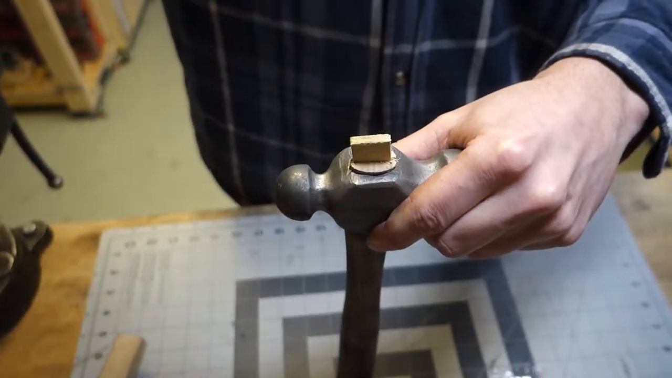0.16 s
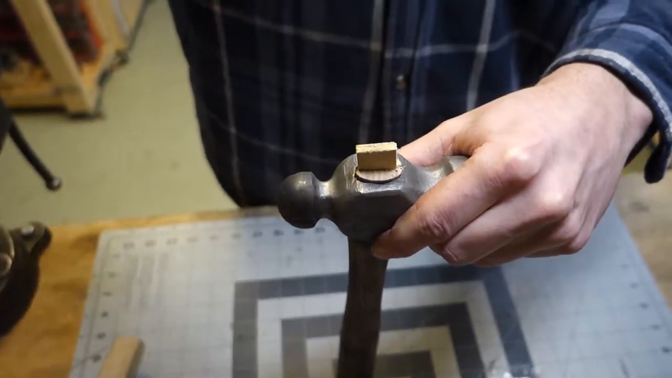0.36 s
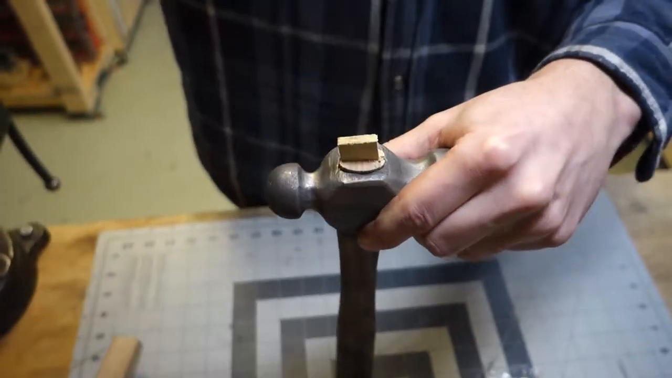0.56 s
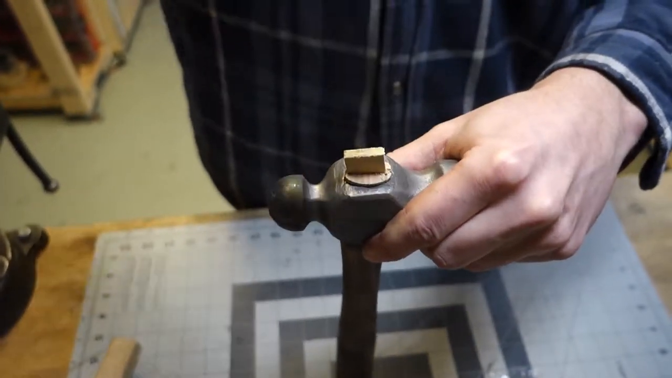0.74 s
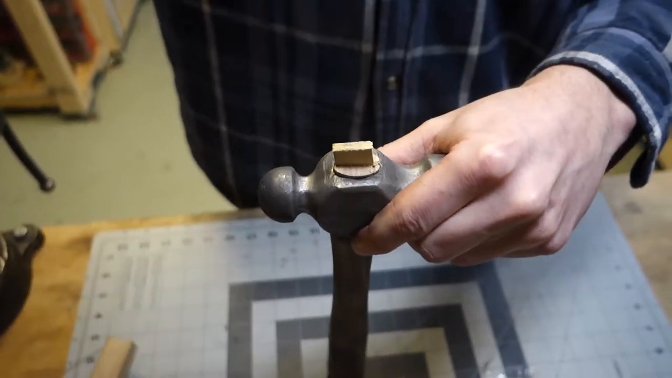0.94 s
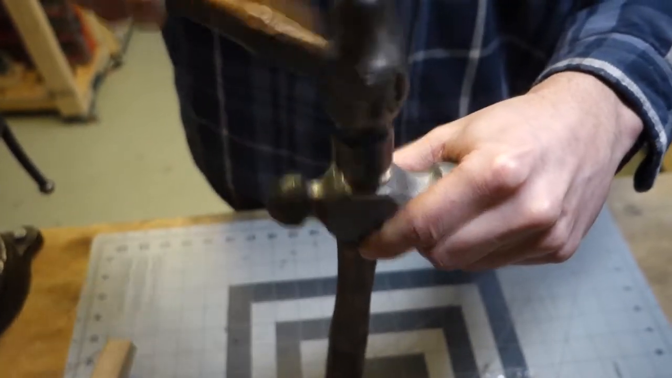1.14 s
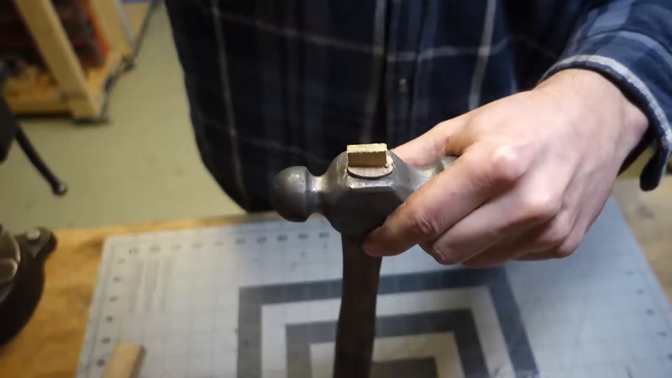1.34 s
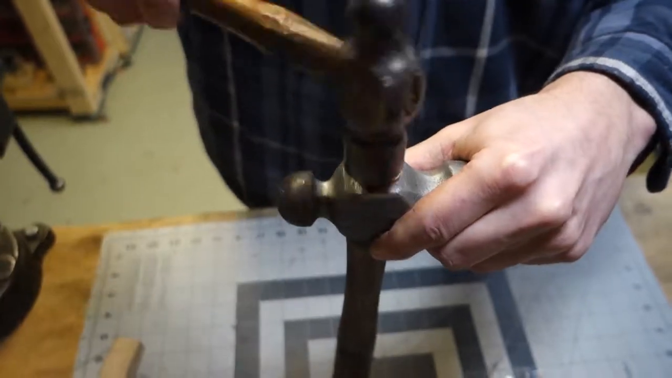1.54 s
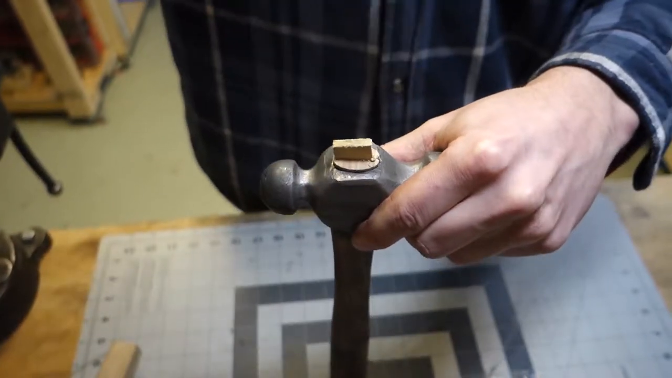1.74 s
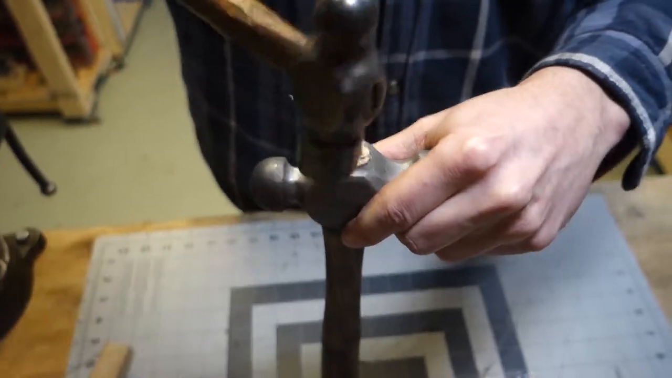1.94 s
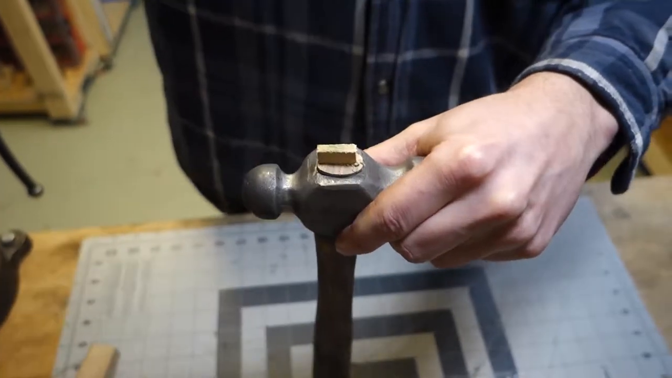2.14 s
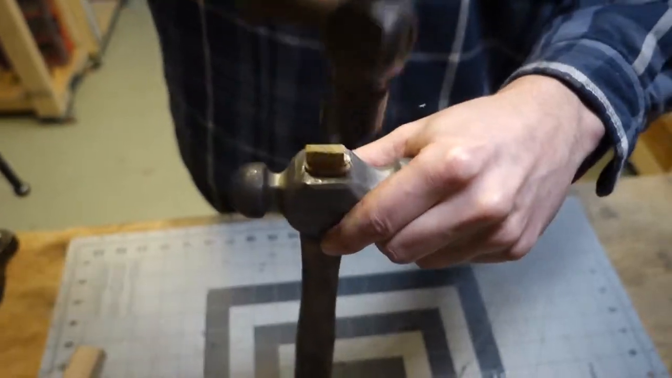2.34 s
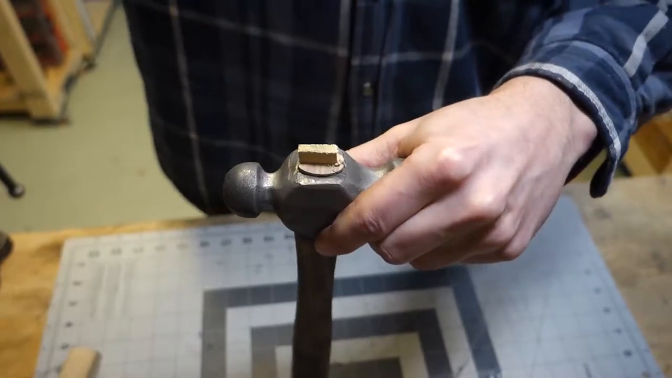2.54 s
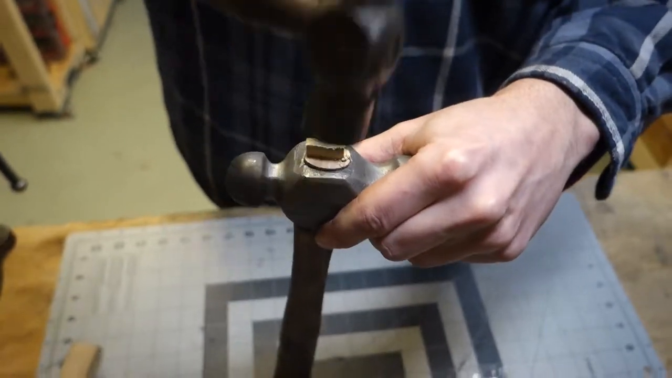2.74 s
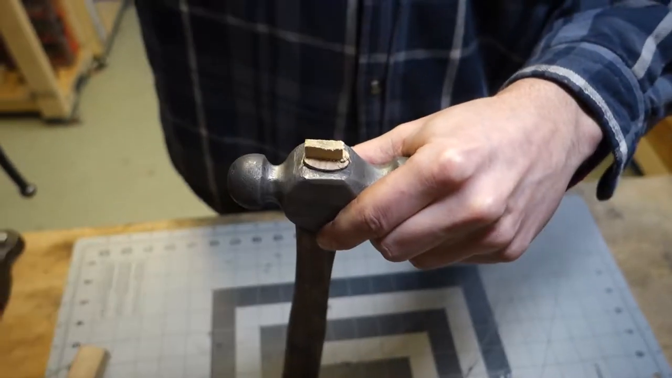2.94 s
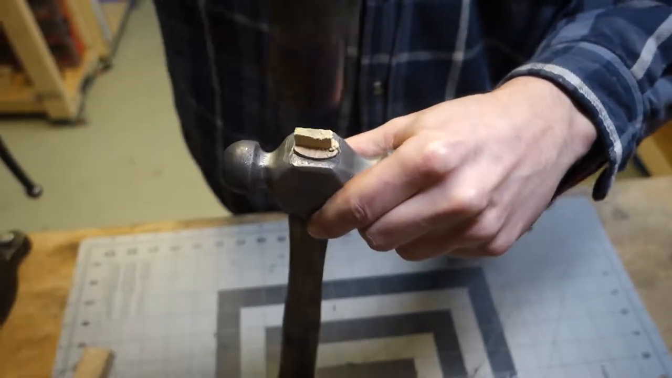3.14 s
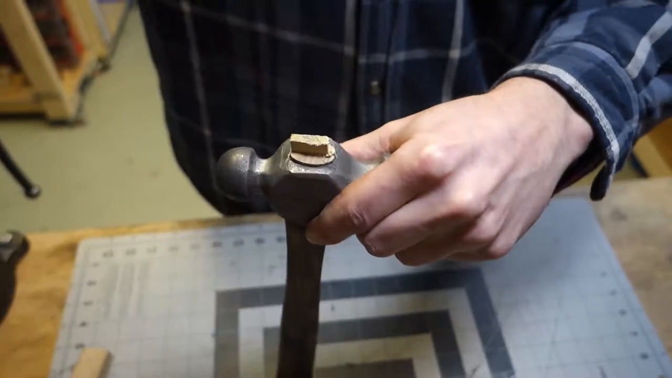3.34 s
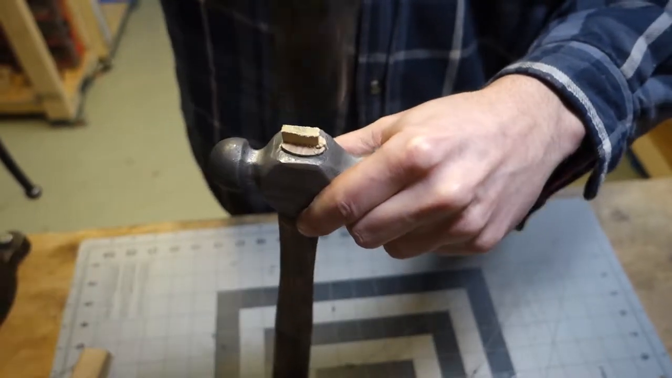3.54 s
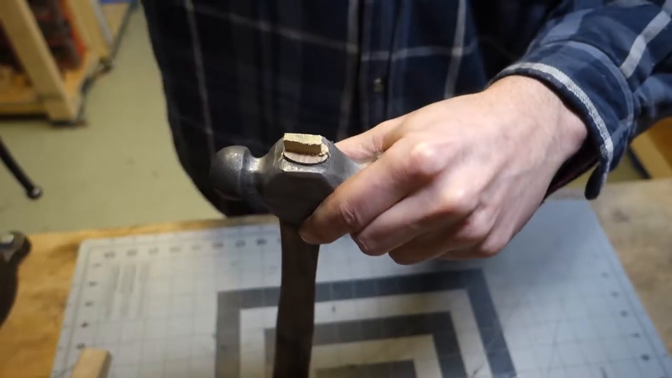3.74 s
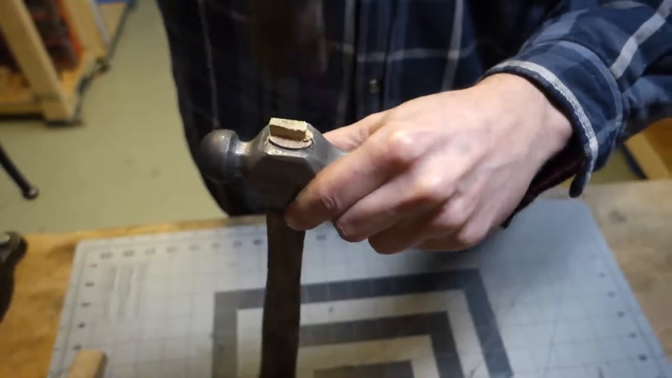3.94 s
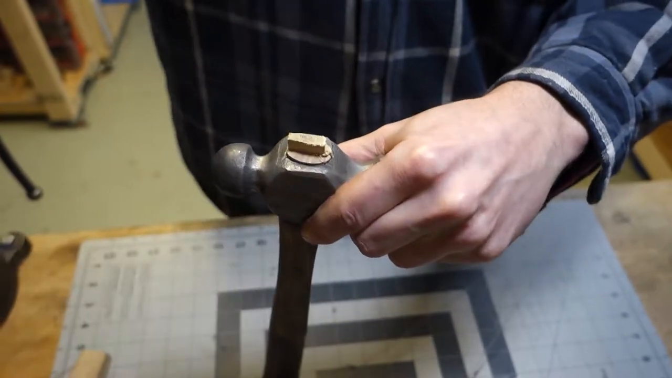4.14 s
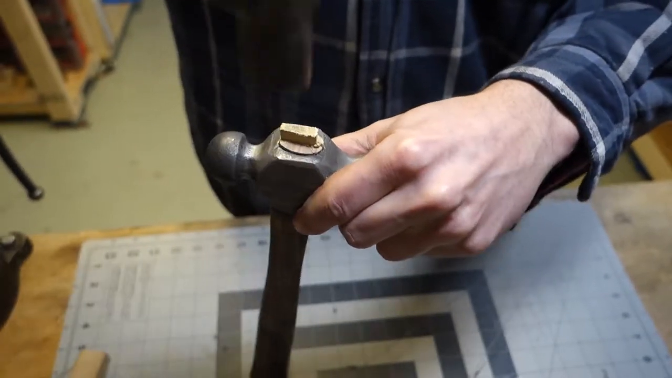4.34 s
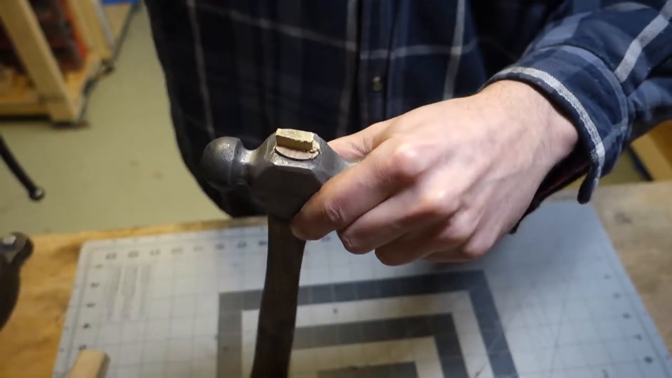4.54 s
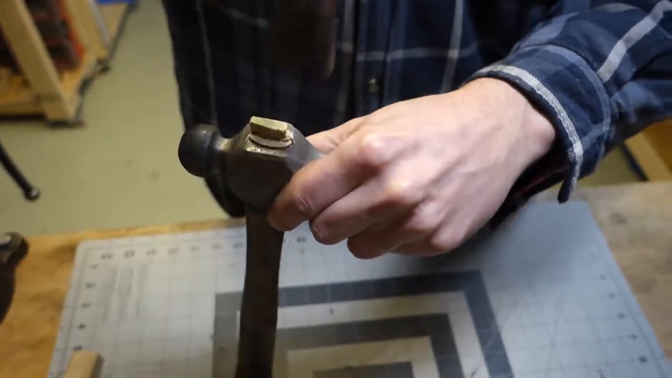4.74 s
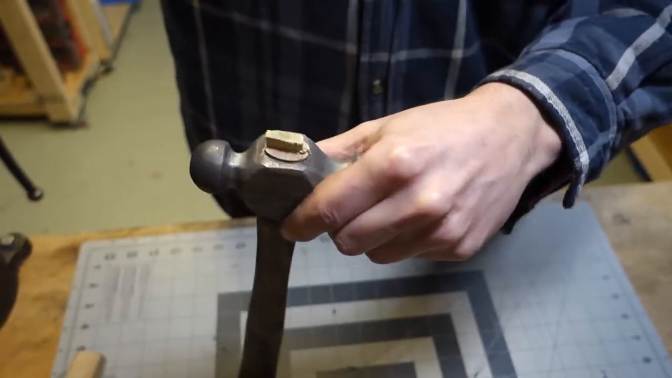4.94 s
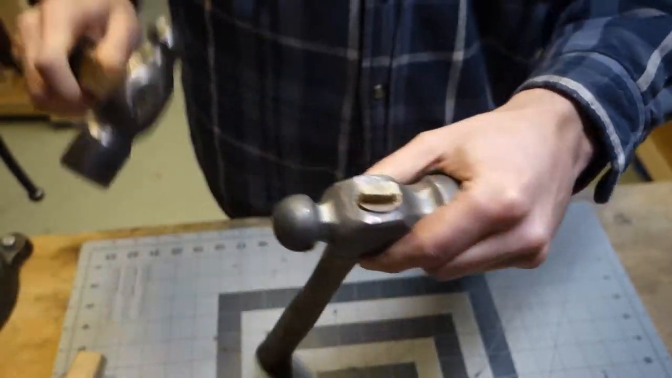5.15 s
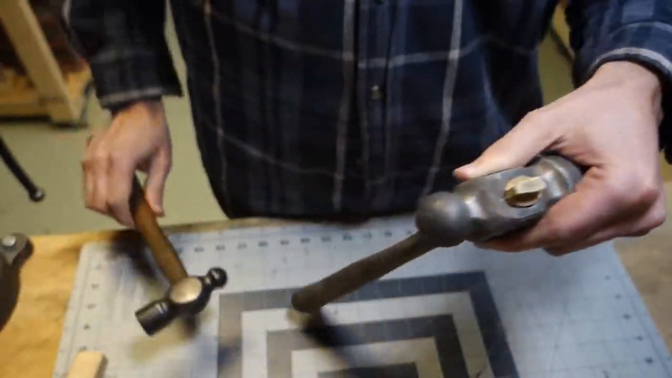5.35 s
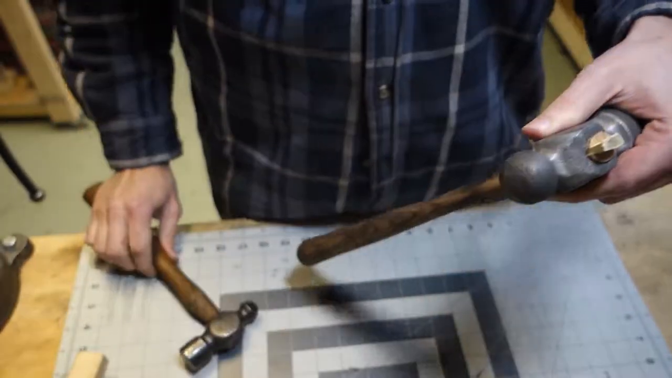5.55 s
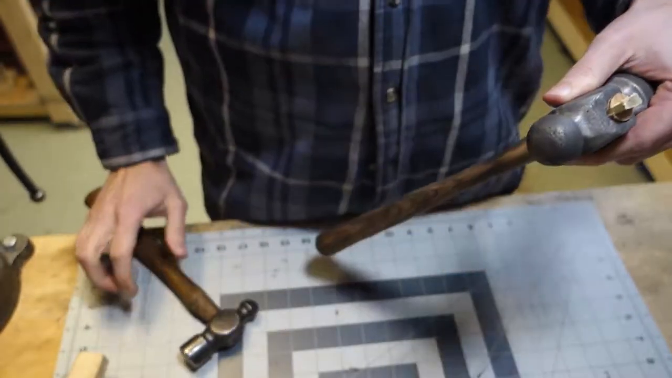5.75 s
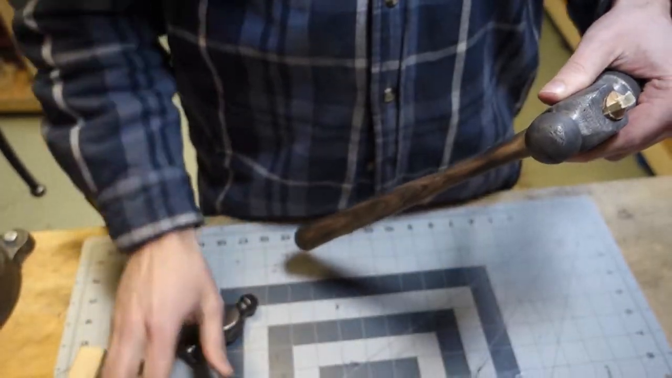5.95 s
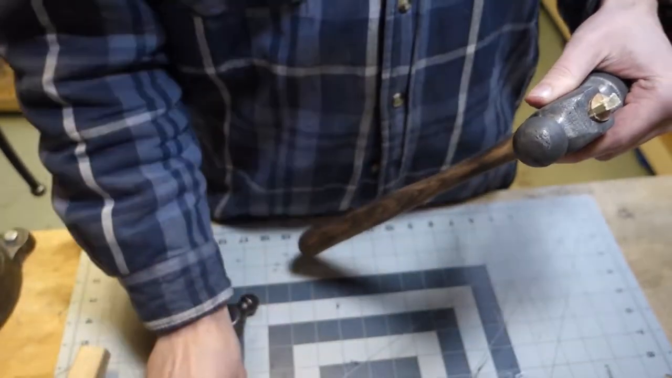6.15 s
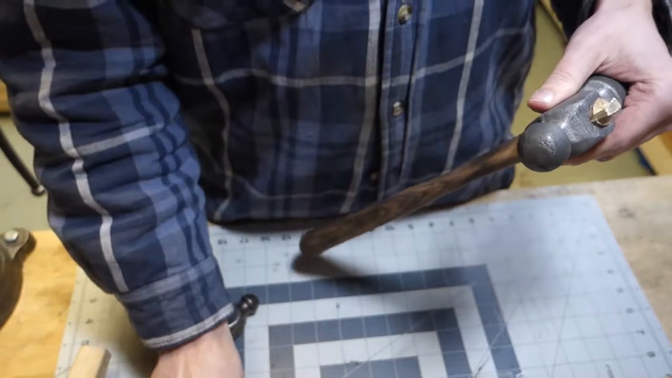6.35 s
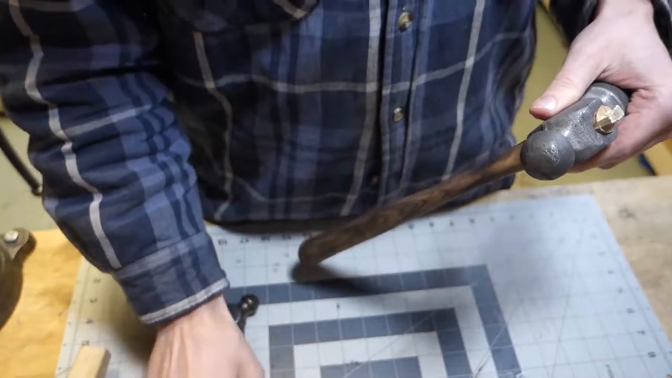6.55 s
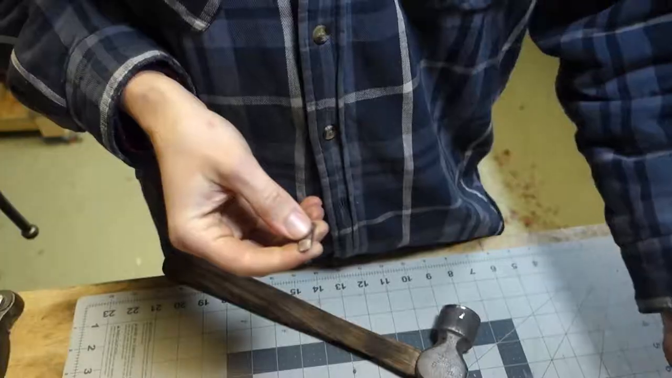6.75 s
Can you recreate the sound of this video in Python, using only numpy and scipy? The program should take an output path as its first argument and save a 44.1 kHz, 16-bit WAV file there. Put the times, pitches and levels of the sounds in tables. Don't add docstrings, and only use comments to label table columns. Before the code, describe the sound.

Twelve even hammer blows knock a wooden wedge home with bench booms and rattling loose steel, then the hammer is laid down and small parts clink.

```python
import sys
import numpy as np
from scipy import signal
from scipy.io import wavfile

SR = 44100
rng = np.random.default_rng(int(sys.argv[2]) if len(sys.argv) > 2 else 0)


def boost(x):
    u = np.asarray(x, float) / 20
    return 10 ** u


def store_pcm(level_fs):
    pcm = np.round(np.clip(level_fs, -1, 1) * 32767).astype(np.int16)
    wavfile.write(sys.argv[1], SR, np.atleast_2d(pcm).T)


N = 299435

# t/s, crack of steel on wood level/dB, ring of the striking head level/dB
BLOWS = [(0.446, -39, -53), (0.8301, -60, -46), (1.2045, -44, -38), (1.573, -43, -53.5), (1.9573, -50, -45),
         (2.3464, -42, -51.5), (2.7421, -45, -50.5), (3.129, -33.5, -55.5), (3.5342, -33.5, -44),
         (3.9151, -31.5, -48.5), (4.32, -40.5, -45.5), (4.71, -40, -60)]
# force/dB, brightness/dB, tock of the wedge level/dB
LANDINGS = [(-.3, 0.9, -25), (.3, -0.1, -29.5), (.3, -0.5, -27.5), (.3, -1.3, -29.5), (.3, -0.45, -27),
            (-.3, 0.6, -23.5), (.3, 0.5, -22), (.3, -1, -22.5), (.3, 0.24, -21), (.3, 0.5, -19.5),
            (.3, -0.8, -21), (.3, -0.1, -20.5)]
LOOSE_FORCE_DB, SEATED_FORCE_DB, SEATING_S = -4, -13.5, 4.1
LOOSE_HARD_DB, SEATED_HARD_DB, HARDENING_S = -2.5, 0.3, 0.95
HANDLE_LAG_S = 0.0007
PARTING_S = 0.16
CONTACT_HZ = 850
# f/Hz, level/dB, T60/s
BENCH_MODES = [(61.1, -16, 0.33), (95.04, -32, 0.72), (136.5, 0.5, 0.19), (147.2, -15, 0.4),
               (176, 1, 0.023), (214.4, -6.5, 0.28), (249, -8, 0.24), (301.3, -4, 0.066),
               (331.1, -4.5, 0.24), (376.5, -10, 0.28), (403.5, -16, 0.36), (477, -18, 0.35),
               (521, -19.5, 0.29), (586, -32.5, 0.072), (640, -18, 0.1), (760, -28, 0.17),
               (1300, -35.5, 0.2), (1630, -27.5, 0.14), (1569, -15.5, 0.36), (2130, -32, .15)]
# f/Hz, level/dB
PANELS = [(440, -29.5), (522, -28.5), (769, -30), (947, -32.5), (1232, -29.5), (1510, -36), (1555, -34),
          (1628, -33.5), (1647, -31), (1878, -44), (2016, -39.5), (2091, -32), (2277, -35), (3165, -42.5)]
PANEL_T60_S = 0.27
# f/Hz, level/dB, T60/s
WEDGE_MODES = [(1640, -1.5, .012), (2460, -9, .01), (7860, -13.5, 0.0028)]
# f/Hz, level/dB, T60/s
STRIKER_MODES = [(15500, 0, .14), (13100, -3, .05), (8100, -7.5, 0.017)]
# t/s, level/dB
LATE_RINGS = [
    (0.46, -62),
    (0.852, -57.5),
    (1.59, -57.5),
    (2.362, -54),
    (2.757, -53),
]
# f/Hz, level/dB per Hz
SNAP_COLOUR = [(500, -35), (2000, 6), (4000, 8.5), (8000, 3), (16000, -20.5)]
# f/Hz, level/dB per Hz
KNOCKING_COLOUR = [(400, -18.5), (900, -0.5), (1700, 1.5), (2400, -2.5), (3400, -13), (6000, -35)]
KNOCKING_DB, KNOCKING_T60_S, KNOCKING_FOLLOWS = -21.5, 0.12, 4.2

# f/Hz, level/dB
WASH_COLOUR = [(30, -43), (60, -16), (140, 2), (216, 3), (370, 0), (700, -12), (1200, -18), (1700, -20),
               (2360, -25), (3340, -34.5), (4700, -40.5), (7000, -49.5), (12000, -47.5), (16500, -53)]
# f/Hz, T60/s
WASH_T60 = [(50, 0.2), (130, 0.22), (350, 0.24), (920, 0.35), (2430, 0.32), (4500, 0.27), (7500, 0.26),
            (14000, 0.055)]
# f/Hz, level/dB per Hz
LATE_COLOUR = [(24, -44.5), (40, -18), (129, 9), (244, 1.5), (308, 2.5), (878, -25), (1540, -47.5),
               (3000, -72.5), (3900, -93), (6600, -120)]
# f/Hz, share/1
SAMENESS = [(100, .8), (500, .75), (1500, .75), (3000, .65), (5000, .25)]
# f/Hz, likeness/1
LIKENESS = [(60, 1), (180, 1), (550, 0.85), (1650, 0.77), (4970, 0.022), (15000, 0.073)]
# f/Hz, level/dB
LEAN = [(60, 12.5), (240, 0.5), (950, 2), (3770, -2.5), (15000, -6)]

# t/s, tick level/dB, ring of the punch level/dB, ring of the head level/dB
HOPS = [(0.478, -16, -53, -38.5), (0.51, -26, -57, -51), (0.871, -19.5, -58, -57.5),
        (1.247, -20.5, -54, -43), (1.6204, -26.5, -62.5, -41.5), (1.652, -51.5, -66, -60.5),
        (1.981, -34, -51, -44), (2.024, -34.5, -63.5, -69.5), (2.385, -38, -54, -33),
        (2.764, -50, -50.5, -60.5), (2.787, -26, -52.5, -41), (3.1708, -21.5, -52, -37.5),
        (3.1902, -29, -59.5, -53), (3.572, -25.5, -46.5, -37), (3.599, -27.5, -64, -49),
        (3.617, -25.5, -46, -61), (3.979, -29.5, -57.5, -61.5), (3.9978, -25.5, -61.5, -51),
        (4.0283, -28.5, -47.5, -73), (4.363, -27.5, -55.5, -46.5), (4.395, -27, -59, -61),
        (4.4557, -36.5, -45, -63), (4.7537, -40.5, -51.5, -42), (4.781, -41.5, -51.5, -45)]
# f/Hz, level/dB, T60/s
PUNCH_MODES = [(3850, -6.5, 0.11), (3900, -8, 0.14), (3800, -14, .14)]
# f/Hz, level/dB, T60/s
HEAD_MODES = [(6860, -5, 0.16), (6900, -11.5, 0.12), (7060, -14, 0.09)]
# f/Hz, level/dB, T60/s
CHISEL_MODES = [(9700, -1.3, 0.14)]
# f/Hz, level/dB, T60/s
RULE_MODES = [(9790, -1.7, 0.16)]
USUAL_HOP_DB = -31
CHISEL_DB, CHISEL_FOLLOWS, RULE_DB, RULE_FOLLOWS = -62.5, 0.45, -60, 1
# t/s, tick level/dB, ring of the thickest bit level/dB, of the thin bits level/dB
JINGLES = [(0.4773, -26.5, -37, -51), (0.519, -52, -61, -70), (0.848, -41, -41.5, -54.5),
           (1.247, -42.5, -48.5, -59), (1.5982, -38.5, -47, -55), (1.645, -44, -60, -68),
           (1.981, -40.5, -43, -53), (2.043, -53.5, -58, -71), (2.389, -39, -45, -57.5),
           (2.7717, -39.5, -37.5, -56.5), (3.1633, -43.5, -61, -59.5), (3.2002, -39.5, -57, -62.5),
           (3.585, -38, -44.5, -57.5), (3.944, -32.5, -53, -61.5), (4.029, -42, -56.5, -77),
           (4.363, -42, -57.5, -60.5), (4.421, -45.5, -62.5, -71.5), (4.749, -42.5, -65.5, -60),
           (4.789, -47, -68.5, -72)]
# f/Hz, level/dB, T60/s
BIT_MODES = [
    [(4269, 1.5, 0.19), (4290, -6, .1)],
    [(11500, -5.5, 0.23), (11400, -8, 0.18), (11700, -6, .16), (12678, 9.5, .18), (12800, -3.5, .16),
     (13447, 1.5, 0.15), (13720, -5, .12)],
]
# f/Hz, level/dB, T60/s
CLUTTER_MODES = [(5130, -7.5, 0.072), (6500, -5.5, .05), (7470, -5, 0.11), (7860, -5, 0.16),
                 (8500, -7, 0.087), (9000, -5.5, 0.11), (10100, -2, 0.071), (11900, -11.5, 0.1),
                 (11700, -5, 0.16), (12300, 0.5, .08), (13140, -2.5, .08), (14050, -6.5, .12),
                 (14460, -1.5, .12), (15470, 1.5, .12)]
# f/Hz, level/dB per Hz
RATTLE_COLOUR = [(2500, -26.5), (4500, 1.5), (9000, -5.5), (13000, -4.5), (16000, -3.5)]

# t/s, thump level/dB, crack level/dB, thump f/Hz, boom in bench and room level/dB
KNOCKS = [(5.583, -50, -48.5, 226, -39), (5.5856, -12.5, -48, 194, -8.5), (5.605, -55, -56, 132, -49),
          (5.634, -51, -57, 250, -58), (5.7175, -23.5, -54, 337, -8.5), (5.7205, -14.5, -73.5, 302, -31),
          (5.735, -36, -59, 268, -26), (5.743, -2.5, -51, 210, -20.5), (5.7561, -14.5, -58, 249, -38.5),
          (5.7901, -21, -57.5, 242, -51), (5.802, -22, -77, 264, -53), (5.873, -37.5, -73, 219, -59)]
# f/Hz, level/dB, T60/s
LAID_MODES = [(1355, -2, 0.016), (2500, -9, 0.014), (3900, -22, .01), (5090, -30, .008)]
# f/Hz, level/dB per Hz
CLACK_COLOUR = [(250, -21), (600, 14), (1300, 6), (2600, -12), (5000, -21.5), (10000, -32.5), (16000, -38)]
# t/s, thump level/dB, thump f/Hz
PATS = [
    (6.107, -39, 206),
    (6.132, -42, 214),
    (6.158, -48.5, 149),
    (6.198, -41, 198),
    (6.212, -42, 210),
    (6.235, -52, 200),
    (6.263, -63.5, 172),
    (6.301, -60, 184),
    (6.33, -52, 175),
    (6.344, -46, 146),
]
PAT_BOOM_DB = -10
LIGHT_TOUCH_HZ = 90

# t/s, dull part level/dB, bright part level/dB
TICKS = [(6.108, -53.5, -95), (6.1333, -51, -78.5), (6.1572, -51, -81), (6.1714, -48, -84),
         (6.179, -50, -90), (6.189, -60, -82.5), (6.2153, -55, -80), (6.2843, -71.5, -95),
         (6.3093, -71, -93.5), (6.333, -63, -95), (6.354, -58.5, -80), (6.374, -73, -63),
         (6.386, -58, -70.5), (6.5012, -77, -56), (6.516, -69, -54), (6.6348, -75, -70), (6.654, -75, -56),
         (6.6618, -74.5, -52), (6.6855, -63, -57)]
# f/Hz, level/dB, T60/s
SCRAP_MODES = [(1160, -1, 0.098), (2080, -3, 0.048), (2620, -7, .05), (3550, -18, .03), (4400, -13, .03)]
# f/Hz, level/dB, T60/s
FLECK_MODES = [(6300, -6, .012), (8900, 0, .016), (12200, 0, .016), (14500, 0, .016)]
# t/s, peak level/dB, build-up/s per 20 dB, decay/s per 20 dB
BRUSH = [
    (6.17, -70.5, .08, .15),
    (6.3, -79, .15, .1),
    (6.4, -63, .016, .04),
    (6.516, -68, .1, .05),
]
# f/Hz, level/dB per Hz
BRUSH_COLOUR = [(500, -17), (800, -4), (1200, -7), (1670, -13), (2360, -1), (3340, -12), (4700, -21),
                (9000, -29), (16000, -44)]
# t/s, lower part level/dB, higher part level/dB
CLINKS = [
    (6.3963, -41, -58),
    (6.439, -40.5, -36),
]
# f/Hz, level/dB, T60/s
PART_MODES = [(2637, 3.5, 0.059), (3845, -2, 0.11), (2080, 0, 0.032), (2510, -6, 0.045), (4150, -12, 0.042),
              (3880, -6, 0.06), (4500, -15, .08)]
# f/Hz, level/dB, T60/s
SMALL_PART_MODES = [(6655, -8, 0.051), (6580, -8.5, 0.028), (8740, -14, 0.034), (10600, -30, .08)]
# t/s, level/dB
CLOSING_NOISE = [
    (6.678, -60),
    (6.684, -53.5),
    (6.697, -50.5),
    (6.712, -56),
    (6.739, -60),
    (6.744, -53),
    (6.76, -57.5),
    (6.79, -59.5),
]
# f/Hz, level/dB per Hz
CLOSING_COLOUR = [(24, -45), (40, -11), (90, 1.5), (121, -17), (300, -17.5), (349, -4), (386, -32),
                  (656, -11.5), (865, -42), (1330, -1.5), (1840, -28.5), (15300, -30), (16500, -37)]

# t/s, level/dB
RUMBLE = [
    (.35, -59),
    (5.2, -67),
    (5.45, -73),
    (5.55, -79.5),
    (6.0, -79),
    (6.3, -94.5),
    (6.45, -69),
    (6.54, -89),
    (6.79, -83),
]
# f/Hz, level/dB per Hz
RUMBLE_COLOUR = [(25, -27), (60, -11), (115, 2.5), (220, -12), (400, -24), (800, -36), (1500, -48.5)]
EARLIER_DB, EARLIER_HOLD_S, EARLIER_T60_S = -46.5, 0.069, 0.53
# f/Hz, level/dB per Hz
HISS_COLOUR = [(300, -20), (800, -8.5), (1600, 2), (3100, -5), (8000, -8), (11500, -14.5), (12800, -47),
               (16500, -48.5)]
HISS_DB = -89.5
# t/s, level/dB
CAMERA_GAIN = [
    (0, -9),
    (.45, -4),
    (.56, 2),
    (.82, 2.5),
    (6.79, 2.5),
]
HOLLOW_HZ, HOLLOW_SHARE = 965, 0.37
OVERLOAD = 2.6


def at_hz(points, hz):
    table_hz, value = np.transpose(points)
    return np.interp(np.log(hz), np.log(table_hz), value)


def in_time(rows):
    s, db = np.transpose(rows)
    return boost(np.interp(np.arange(N) / SR, s, db, left=-200))


def highpass(x, hz):
    return signal.sosfilt(signal.butter(2, hz, "high", fs=SR, output="sos"), x)


def clicks(rows, db):
    out = np.full(N, 1e-18)
    out[np.round(np.array(rows)[:, 0] * SR).astype(int)] = boost(db)
    return out


def soften(x, hz):
    r = np.exp(-2 * np.pi * hz / SR)
    return signal.lfilter([(1 - r) ** 2], [1, -2 * r, r * r], x)


def fade(x, t60):
    return signal.lfilter([1], [1, -boost(-60 / (t60 * SR))], x)


def strike(rows, db, modes, scatter_db):
    out = 0
    chance = rng.standard_normal((len(rows), len(modes)))
    for k, (hz, mode_db, t60) in enumerate(modes):
        r = boost(-60 / (t60 * SR))
        w = 2 * np.pi * hz / SR
        push = (-1) ** k * clicks(rows, db + mode_db + scatter_db * chance[:, k])
        out = out + signal.lfilter([0, np.sin(w)], [1, -2 * r * np.cos(w), r * r], push)
    return out


def noise_bank():
    edges = 31 * 2 ** np.arange(0, 9.1, 0.5)
    white = rng.standard_normal((2, 2, N))
    bank = []
    for k, (low, high) in enumerate(zip(edges, edges[1:])):
        band_filter = signal.butter(3, [low, high], "band", fs=SR, output="sos")
        mid, side = signal.sosfilt(band_filter, white[k % 2])
        centre = np.sqrt(low * high)
        alike = np.clip(at_hz(LIKENESS, centre), 0, 1)
        bank.append((centre, np.sqrt(1 + alike) * mid + np.sqrt(1 - alike) * side * [[1], [-1]]))
    return bank


def coloured(bank, spectrum, turn):
    out = np.roll(sum(boost(at_hz(spectrum, hz)) * band for hz, band in bank), turn, axis=1)
    return out / np.sqrt(np.mean(out ** 2))


def crack(noise, rows, db, t60):
    return noise * soften(fade(clicks(rows, db), t60), CONTACT_HZ)


def nearby_echoes(x, t60, wet_db):
    tail = rng.standard_normal((2, SR // 5)) * boost(-60 * np.arange(SR // 5) / SR / t60)
    echoes = signal.fftconvolve(x[None], tail / np.sqrt(t60 * SR / 14), axes=1)[:, :N]
    return x + boost(wet_db) * echoes


def alike_blows(noise, share):
    starts = np.round(np.array(BLOWS)[:, 0] * SR).astype(int)
    now = np.arange(N)
    latest = np.maximum(np.searchsorted(starts, now, "right") - 1, 0)
    age = now - starts[latest]
    share = np.minimum(1.25 * share * np.exp(-age / SR / PARTING_S), 1)
    return np.sqrt(1 - share) * noise + np.sqrt(share) * noise[:, age]


def seating(loose, seated, time_s):
    s = np.array(BLOWS)[:, 0]
    return seated + (loose - seated) * np.exp(-(s - s[0]) / time_s)


def bench(rows, db, scatter_db, contact_hz, modes=BENCH_MODES):
    age = np.arange(SR) / SR
    hz, mode_db, t60 = np.transpose(modes)
    swelling = 1 - np.exp(-(age / 0.0032) ** 2)
    rings = boost(-60 * age / t60[:, None]) * np.sin(2 * np.pi * hz[:, None] * age) * swelling
    scatter = scatter_db * rng.standard_normal((len(rows), len(hz)))
    pushes = (-1) ** np.arange(len(hz)) * boost(db[:, None] + mode_db + scatter)
    out = np.zeros(N + SR)
    for row, boom in zip(rows, pushes @ rings):
        out[round((row[0] + HANDLE_LAG_S) * SR):][:SR] -= boom
    return soften(out[:N], contact_hz)


def panels(force, hard):
    modes = [(hz, db, PANEL_T60_S) for hz, db in PANELS]
    return nearby_echoes(bench(BLOWS, force + hard - 3.5, 3.0, 7500, modes), 0.38, 0.5)


def striking_steel():
    ring, late_db = np.array(BLOWS)[:, 2], np.array(LATE_RINGS)[:, 1]
    blows = nearby_echoes(strike(BLOWS, ring + 3, STRIKER_MODES, 1.5), 0.077, 1.5)
    return blows + strike(LATE_RINGS, late_db, STRIKER_MODES[:1], 1)


def wedge_knocking(bank, hard, edge_db):
    noise = alike_blows(coloured(bank, KNOCKING_COLOUR, turn=N // 11), at_hz(SAMENESS, 1700))
    push = clicks(BLOWS, KNOCKING_DB + KNOCKING_FOLLOWS * hard + 2 * edge_db)
    return noise * soften(fade(push, KNOCKING_T60_S), 83)


def workshop(bank, force, hard, knock_push):
    out = 0
    for hz, band in bank:
        push = clicks(BLOWS, force + hard * np.clip(np.log2(hz / 250), 0, 1))
        treble_loss = 7.5 * max(np.log2(hz / 900), 0) + 4.4 * max(np.log2(hz / 2600), 0)
        duller = boost(-treble_loss - 25.0 * max(np.log2(130 / hz), 0))
        t60 = at_hz(WASH_T60, hz)
        wash = boost(at_hz(WASH_COLOUR, hz) + 9.5) * (fade(push, t60) + duller * fade(knock_push, 0.9 * t60))
        lean = boost(at_hz(LEAN, hz) / 2 * np.array([[1], [-1]]))
        out = out + lean * alike_blows(band, at_hz(SAMENESS, hz)) * soften(wash, 38)
    late = soften(fade(clicks(BLOWS, force) + boost(1.5) * knock_push, 1.14), 11)
    return out + boost(-38.0) * late * coloured(bank, LATE_COLOUR, turn=N // 5)


def loose_steel(bank):
    noise = coloured(bank, RATTLE_COLOUR, turn=N // 6)
    hop_db, punch_db, head_db = np.transpose(HOPS)[1:]
    jingle_db, *jingle_rings = np.transpose(JINGLES)[1:]
    out = strike(HOPS, hop_db - 33.0, CLUTTER_MODES, 3.9)
    out = out + strike(JINGLES, jingle_rings[1] + 2.4, CLUTTER_MODES, 4.5)
    swing = hop_db - USUAL_HOP_DB
    hop_rings = punch_db, head_db, CHISEL_DB + CHISEL_FOLLOWS * swing, RULE_DB + RULE_FOLLOWS * swing
    hopping = PUNCH_MODES, HEAD_MODES, CHISEL_MODES, RULE_MODES
    for rows, rings, things in ((HOPS, hop_rings, hopping), (JINGLES, jingle_rings, BIT_MODES)):
        out = out + sum(strike(rows, db + 3.5, thing, 2.5) for db, thing in zip(rings, things))
    rattle = crack(noise, HOPS, hop_db - 13, 0.071) + crack(noise, JINGLES, jingle_db - 7.0, 0.094)
    return (nearby_echoes(out, 0.096, 1.5) + rattle) * boost([[-1.5], [1.5]])


def thuds():
    out = np.zeros(N + SR)
    age = np.arange(SR // 5) / SR
    swelling = 1 - np.exp(-(age / 0.0033) ** 2)
    for s, db, hz in [(s, db, hz) for s, db, _, hz, _ in KNOCKS] + [tuple(pat) for pat in PATS]:
        modes = ((hz, 4, 0.03), (1.63 * hz, -4, 0.035), (2.62 * hz, -10, 0.03))
        thump = sum(boost(mode_db - 60 * age / t60) * np.sin(2 * np.pi * f * age) for f, mode_db, t60 in modes)
        out[round(s * SR):][:len(age)] += boost(db + 2.0) * thump * swelling
    return soften(out[:N], 810)


def laid_hammer(bank):
    tap = np.array(KNOCKS)[:, 2]
    clack = crack(coloured(bank, CLACK_COLOUR, turn=N // 8), KNOCKS, tap + 16, 0.061)
    return clack + strike(KNOCKS, tap + 14, LAID_MODES, 7.6)


def fingers(bank, bright):
    dull_db, bright_db = np.transpose(TICKS)[1:]
    dull = soften(fade(clicks(TICKS, dull_db - 18), 0.047), 300)
    mat = (strokes() * boost(-4.5) + dull) * coloured(bank, BRUSH_COLOUR, turn=N // 7)
    scrap = strike(TICKS, dull_db - 17.5, SCRAP_MODES, 6.5)
    fleck = strike(TICKS[-4:], bright_db[-4:] - 8, FLECK_MODES, 3.0)
    return mat + scrap + crack(bright, TICKS, bright_db - 8.5, 0.046) + fleck


def strokes():
    t = np.arange(N) / SR
    return sum(boost(db - 20 * np.maximum((s - t) / rise, (t - s) / fall)) for s, db, rise, fall in BRUSH)


def small_parts(bright):
    low_db, high_db = np.transpose(CLINKS)[1:]
    rings = strike(CLINKS, low_db - 15.5, PART_MODES, 0.93)
    rings = rings + strike(CLINKS, high_db - 12.0, SMALL_PART_MODES, 1)
    return nearby_echoes(rings, 0.084, 2.6) + crack(bright, CLINKS, low_db - 20.5, 0.054)


def closing_noise(bank):
    return in_time(CLOSING_NOISE) * coloured(bank, CLOSING_COLOUR, turn=N // 9) * boost([[-1.3], [1.3]])


def rumble():
    t = np.arange(N) / SR
    s, db = np.transpose(RUMBLE)
    earlier_db = EARLIER_DB - 60 / EARLIER_T60_S * np.maximum(t - EARLIER_HOLD_S, 0)
    return boost(np.interp(t, s, db)) + boost(earlier_db)


def background(bank):
    floor = rumble() * coloured(bank, RUMBLE_COLOUR, turn=N // 2)
    return floor + boost(HISS_DB) * coloured(bank, HISS_COLOUR, turn=N // 4)


def scene():
    bank = noise_bank()
    bright = coloured(bank, SNAP_COLOUR, turn=N // 3)
    snap = np.array(BLOWS)[:, 1]
    push_db, edge_db, tock_db = np.transpose(LANDINGS)
    force = seating(LOOSE_FORCE_DB, SEATED_FORCE_DB, SEATING_S) + 11.5 + push_db
    hard = seating(LOOSE_HARD_DB, SEATED_HARD_DB, HARDENING_S)
    touches = [row[:1] for row in KNOCKS] + [row[:1] for row in PATS]
    touch_db = np.append(np.array(KNOCKS)[:, 4], np.array(PATS)[:, 1] + PAT_BOOM_DB)

    blows = bench(BLOWS, force - 1.5, 0.91, 700) + panels(force, hard)
    blows = blows + crack(bright, BLOWS, snap + 1.6, 0.02) + strike(BLOWS, tock_db, WEDGE_MODES, 1.5)
    blows = blows + striking_steel() + wedge_knocking(bank, hard, edge_db)
    room = workshop(bank, force, hard + edge_db, clicks(touches, touch_db - 12))
    laid = highpass(bench(touches, touch_db - 24, 1.3, 600), LIGHT_TOUCH_HZ) + thuds() + laid_hammer(bank)
    handling = fingers(bank, bright) + small_parts(bright) + closing_noise(bank)
    return blows + room + loose_steel(bank) + laid + handling + background(bank)


def roll_off(x):
    return signal.sosfilt(signal.butter(12, 17110, fs=SR, output="sos"), x)


def record(dry):
    t = np.arange(N) / SR
    dry = highpass(dry, 52)
    dry = signal.sosfilt(signal.cheby2(8, 30, 16300, fs=SR, output="sos"), dry)
    dry = dry - HOLLOW_SHARE * signal.lfilter(*signal.iirpeak(HOLLOW_HZ, 4.5, fs=SR), dry)
    dry = OVERLOAD * np.tanh(dry / OVERLOAD)
    over_db = np.maximum(20 * np.log10(np.abs(dry).max(axis=0) + 1e-9) + 8.14, 0)
    held_db = np.maximum.accumulate(over_db + 350 * t) - 350 * t
    limited = dry * boost(-0.9 * soften(np.maximum(held_db, 0), 530)) * in_time(CAMERA_GAIN)
    return roll_off(0.71 * np.tanh(limited / 0.77))


dry = scene()
out = record(dry)
store_pcm(out)
```